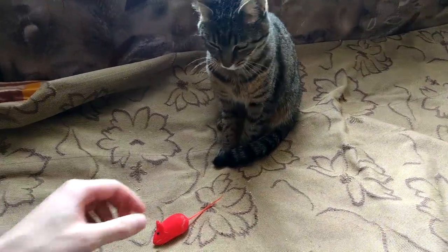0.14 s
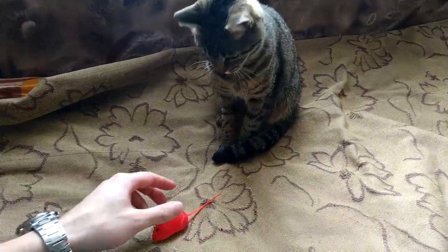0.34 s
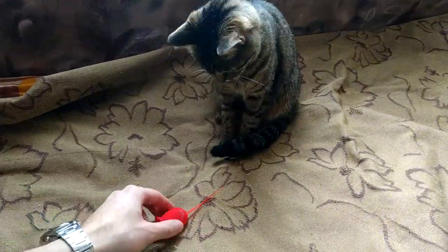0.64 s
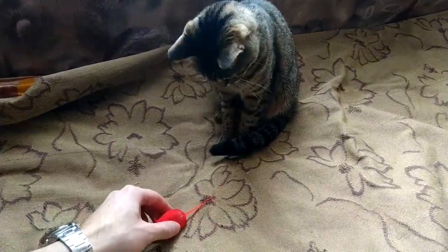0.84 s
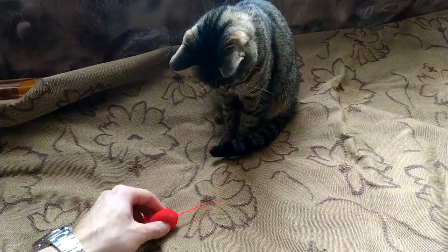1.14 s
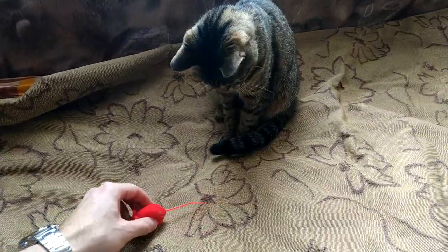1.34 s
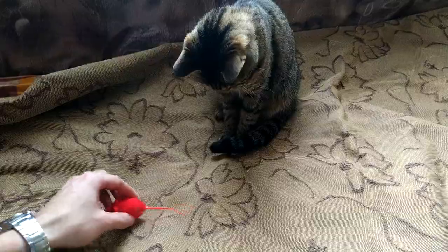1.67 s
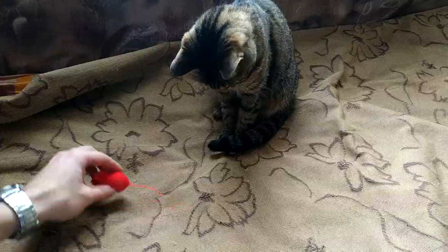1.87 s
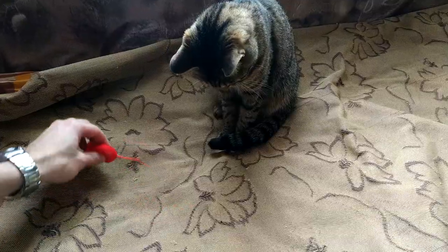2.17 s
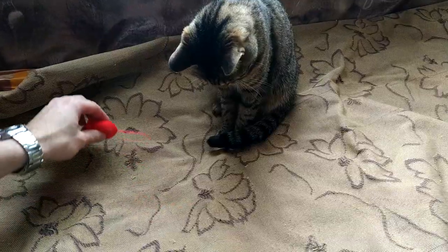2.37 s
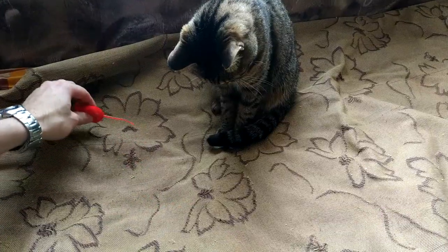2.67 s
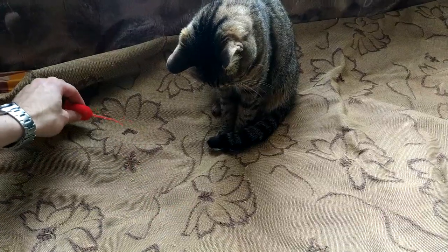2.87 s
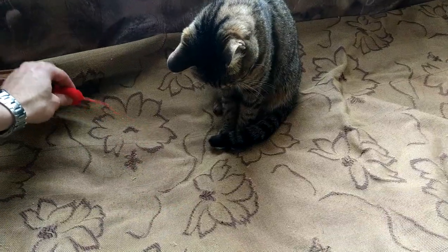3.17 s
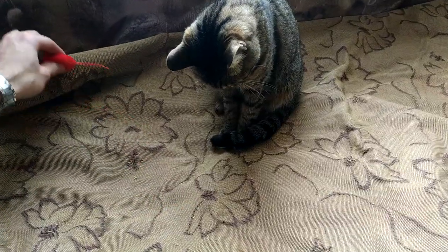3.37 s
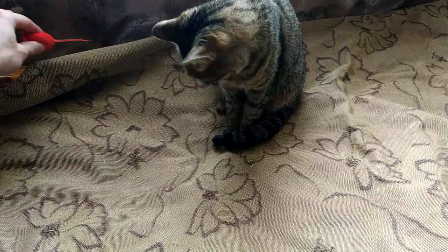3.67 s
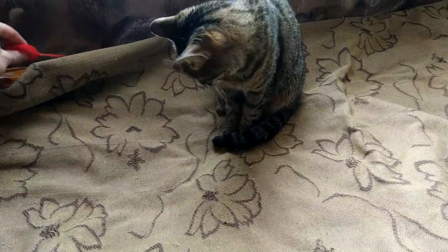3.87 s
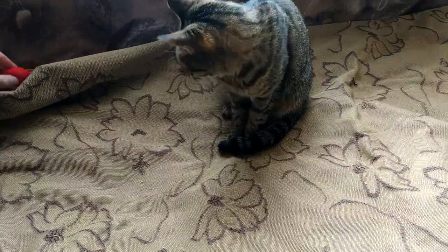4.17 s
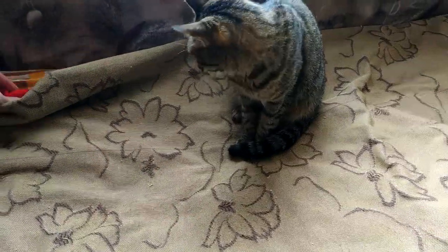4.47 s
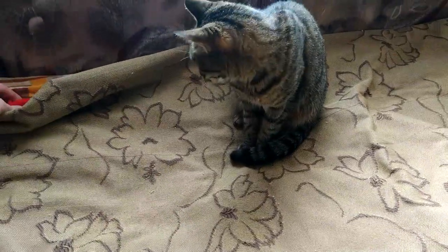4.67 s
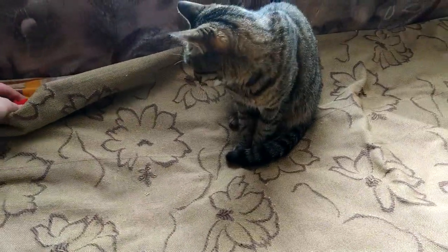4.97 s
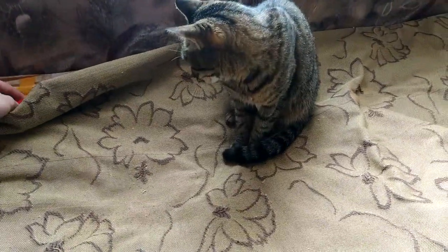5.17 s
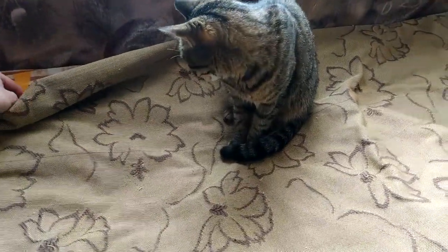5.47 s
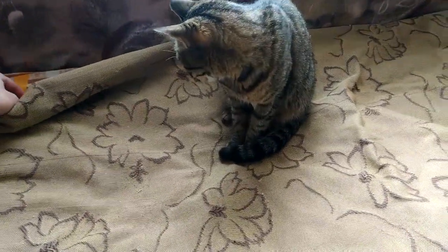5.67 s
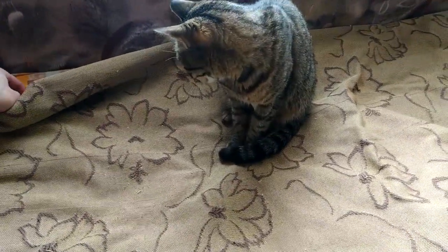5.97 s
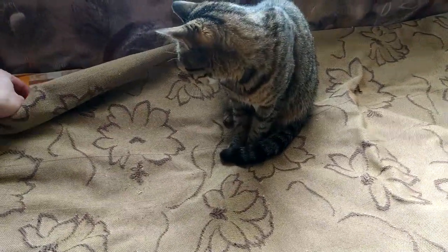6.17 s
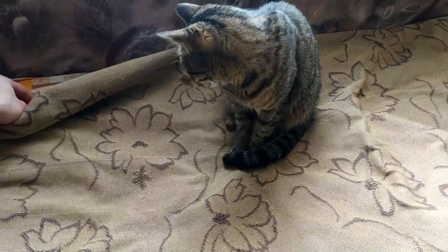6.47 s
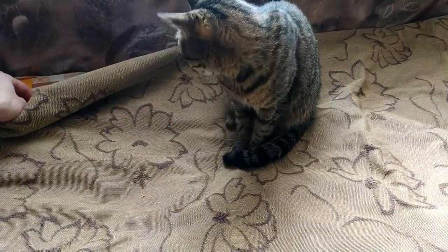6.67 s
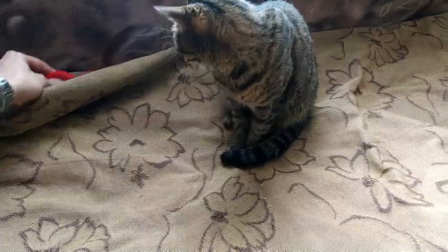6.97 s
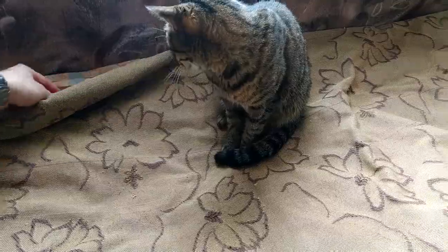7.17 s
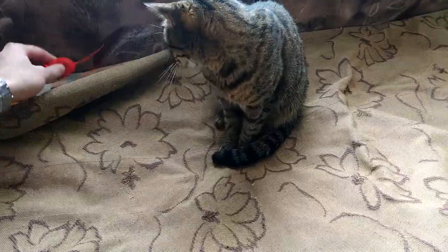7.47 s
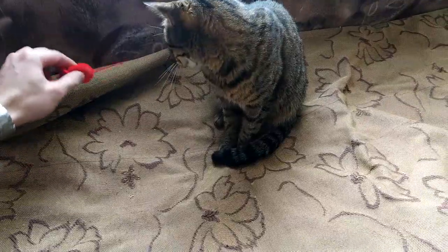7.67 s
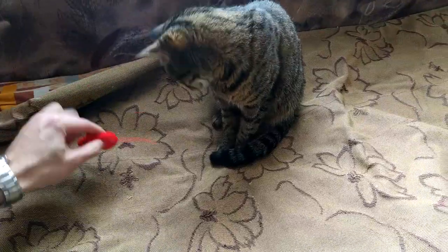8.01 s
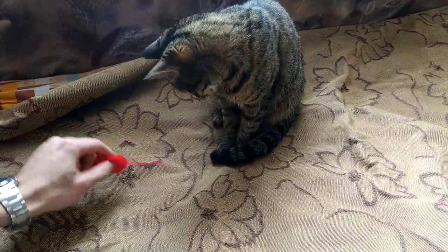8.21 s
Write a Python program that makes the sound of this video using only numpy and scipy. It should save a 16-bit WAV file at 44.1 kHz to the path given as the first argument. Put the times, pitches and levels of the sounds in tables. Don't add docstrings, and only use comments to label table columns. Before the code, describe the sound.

In a quiet furnished room, close to a stereo camera microphone, a hand squeezes a little rubber toy. After a second of faint hiss, hum and cloth rustle come short, piercing reedy squeaks, each arching slightly in pitch and dropping at the end. Past the middle they turn weak, dull and muffled, some barely peeping, then loud bright squeaks return to the end. Soft airy puffs sit between some of them.

```python
import sys
import numpy as np
from scipy import signal
from scipy.io import wavfile
from scipy.ndimage import uniform_filter1d, minimum_filter1d

SR = 44100
rng = np.random.default_rng(int(sys.argv[2]) if len(sys.argv) > 2 else 0)


def unload_audio(sound):
    columns = np.transpose(np.atleast_2d(sound))
    steps = np.round(np.clip(columns, -1, 1) * 32767)
    wavfile.write(sys.argv[1], SR, steps.astype(np.int16))


def elevation(decibels):
    levels = np.asarray(decibels, float)
    return 10 ** (levels / 20)


N = 367970

# [t/s, level/dB]
HUM_LEVEL = [(0.0, -61.5), (0.7, -61), (1.952, -61.5), (2.46, -57.5), (2.85, -59.5), (5.201, -60),
             (5.799, -60.5), (6.301, -66.5), (6.7, -63.5), (7.501, -63), (7.799, -68), (8.34, -65)]
# [f/Hz, density/dB]
HUM_SPECTRUM = [(24, -79), (40, -44.5), (96, -49.5), (177, -8.5), (266, 2), (568, -7.5), (747, -4.5),
                (1120, -10.5), (1210, -19.5), (1500, -17.5), (1950, -61.5), (3300, -120)]
# [f/Hz, width/Hz, level/dB]
HUM_MODES = [(194.4, 20, -69), (273, 21, -74), (346.4, 10, -81.5), (535, 76, -70.5), (618, 7.7, -78),
             (757, 12, -79)]
# [f/Hz, density/dB]
HISS_SPECTRUM = [(590, -29.5), (1000, 2.5), (1050, 3.5), (1310, 5.5), (3420, 3), (13400, 1), (14500, 2)]
HISS_DB = -58.5
# [f/Hz, correlation/1]
LIKENESS = [(60, 0.66), (250, 0.54), (600, 0), (1630, 0.36), (4890, -0.0), (14700, 0.31)]
# [t/s, length/s, low edge f/Hz, high edge f/Hz, level/dB]
PUFFS = [(0.524, 0.14, 1500, 11100, -60), (0.827, 0.2, 4570, 13900, -57.5),
         (1.581, 0.098, 2010, 14140, -56.5), (2.061, 0.25, 5860, 14000, -50.5),
         (2.431, 0.097, 400, 8350, -53), (2.417, 0.2, 156, 488, -54.5), (5.617, .25, 160, 255, -55.5),
         (2.53, 0.074, 6060, 12000, -62.5), (3.109, 0.13, 6730, 13900, -55),
         (3.274, 0.12, 8700, 14100, -54.5), (6.71, 0.12, 7140, 13860, -64), (7.144, 0.052, 380, 5250, -69),
         (8.305, 0.2, 7000, 14200, -52)]
# [t/s, length/s, f/Hz, level/dB]
PEEPS = [
    (5.602, .034, 860, -60),
    (3.31, .03, 860, -65),
    (7.508, .025, 900, -59),
    (7.86, .03, 950, -70),
    (8.29, .03, 1020, -68),
]
# [first beat t/s, length/s, top f/Hz, top level/dB, share of length before letting go/1]
SQUEEZES = [(0.963, 0.07, 1554, -15, 0.46), (2.119, 0.089, 1552, -13.5, 0.32),
            (2.594, 0.057, 1441, -15, 0.36), (2.849, 0.058, 1450, -19, 0.84),
            (3.153, 0.019, 1382, -26, 0.33), (3.412, 0.062, 1487, -17.5, 0.55),
            (3.784, 0.074, 1557, -15.5, 0.49), (4.217, 0.098, 1530, -21, 0.42),
            (4.434, .039, 1326, -35, 0.23), (4.692, .076, 1489, -30, 0.35), (5.054, 0.043, 1318, -42, .3),
            (5.723, 0.06, 1499, -25.5, 0.59), (6.02, 0.03, 1446, -26, 0.39),
            (6.299, 0.032, 1383, -43, 0.23), (6.567, 0.034, 1444, -37.5, 0.26),
            (6.844, 0.073, 1593, -16.5, 0.25), (7.315, 0.1, 1549, -17, 0.69),
            (7.528, 0.052, 1334, -24, 0.15), (7.705, 0.052, 1559, -13, .5),
            (8.098, .041, 1470, -15.5, 0.69)]
# [fundamental level/dB, 3.5 kHz level/dB, 6 kHz level/dB, 13 kHz level/dB]
GRIPS = [(-16, -7, -3, -1), (-25, -23.5, -12, -8), (-23.5, -20, -26, -12), (-21, -10.5, -16.5, -8.5),
         (-13.5, -11, -10.5, -7), (-25, -9, -9.5, -10), (-24, -15.5, -8.5, -4.5), (-18.5, -14.5, -15.5, -5),
         (-8.5, -1, -6, 8), (-0.5, 0, 0.5, -8), (12, 11.5, 1.5, 4.5), (-1.5, 6.5, 4.5, 0.5),
         (-2, 4.5, 0.5, -5), (13.5, 14.5, 7.5, 4), (2.5, 7.5, 1.5, 0.5), (-20.5, -18, -11, -15),
         (-23, -19.5, -19.5, -7), (-22.5, -11.5, -21, -1.5), (-29, -14, -12.5, -10.5),
         (-19, -18.5, -17.5, -10)]
# [overtones left-right/dB, fundamental left-right/dB]
BALANCES = [(-3, -5.5), (0, 4), (1.5, -2.5), (10, -3), (3, -7.5), (16.5, -6), (7, -7), (9.5, -1.5), (9, 10.5),
            (15, -3), (9, 5.5), (4, -0.5), (5.5, -5.5), (5, 2), (7, 1.5), (5, 1.5), (5.5, 4.5), (1.5, 9),
            (0.5, -4.5), (1, -8)]
# [t/s, lead/samples]
LEFT_LEAD = [
    (0.96, 0.5),
    (2.12, 4.75),
    (3.15, 8.6),
    (3.41, 10.8),
    (4.2, 9.6),
    (4.7, 10.6),
    (6.57, 10.4),
    (8.1, 6.3),
]
# [delay/s, left level/dB, right level/dB]
ECHOES = [(.0011, -21.5, -14.5), (.0023, -21, -12.5), (.0041, -27, -21.5), (.0067, -25.5, -13),
          (.0098, -27.5, -38)]
# [f/Hz, t60/s]
ROOM_T60 = [(1000, 0.15), (3000, 0.14), (7000, 0.14), (10000, 0.17), (14000, 0.11)]

RISE, SAG, SAG_POWER, PLUNGE, PLUNGE_S = 0.034, 0.1, 1.3, 0.091, 0.0042
RISE_PER_DB, FIRM_DB = 0.002, -11.5
DB_PER_SHARE = 93
HIDDEN_SHARE, OPEN_DB = 0.2, -17


def evened(x):
    return x / np.sqrt(np.mean(x ** 2) + 1e-20)


def read(points, hz):
    f, value = np.transpose(points)
    return np.interp(np.log(hz + 1), np.log(f + 1), value)


def add(mix, start_s, sound):
    part = mix[:, round(start_s * SR):][:, :sound.shape[-1]]
    part += sound[..., :part.shape[1]]


def wander(count, size):
    white = rng.standard_normal((count, 9000))
    return evened(signal.fftconvolve(white, np.hanning(2 * size)[None], "valid"))


def noise(spectrum, patchy_db):
    frames, hz = N // 256 + 5, np.fft.rfftfreq(1024, 1 / SR)
    a, b, c, d, patches = rng.standard_normal((frames, 513, 5)).T
    patches = uniform_filter1d(patches, size=10, axis=0)
    patches = evened(uniform_filter1d(patches, size=12, axis=1))
    same = np.clip(read(LIKENESS, hz), -1, 1)[:, None]
    left = a + 1j * b
    right = same * left + np.sqrt(1 - same ** 2) * (c + 1j * d)
    z = np.array([left, right]) * elevation(read(spectrum, hz)[:, None] + patchy_db * patches)
    return evened(signal.istft(z, nperseg=1024, noverlap=768)[1][:, :N])


def hum():
    tones = np.zeros(N)
    for hz, width_hz, db in HUM_MODES:
        peak = signal.iirpeak(hz, hz / width_hz, SR)
        tones += elevation(db) * evened(signal.lfilter(*peak, rng.standard_normal(N)))
    level_db = np.interp(np.arange(N) / SR, *np.transpose(HUM_LEVEL))
    return elevation(level_db) * (noise(HUM_SPECTRUM, patchy_db=1.4) + tones / elevation(level_db.mean()))


def hiss():
    return elevation(HISS_DB) * noise(HISS_SPECTRUM, patchy_db=3.0)


def room(near, tail_db=-8, early_db=3, late_db=-22, late_factor=2.1):
    taps = np.zeros((2, SR // 2))
    at = np.arange(200, SR // 2 - 20, 20) + rng.integers(0, 20, (2, (SR // 2 - 201) // 20))
    np.put_along_axis(taps, at, rng.choice([-1., 1.], at.shape), 1)
    hz, t, z = signal.stft(taps, SR, nperseg=256)
    fall_db = -60 * t / read(ROOM_T60, hz)[:, None]
    decay = elevation(early_db + 4.27 * fall_db) + elevation(fall_db) + elevation(late_db + fall_db / late_factor)
    tail = signal.istft(z * decay, SR, nperseg=256)[1]
    tail *= elevation(tail_db) / np.linalg.norm(tail[0])
    echoes = np.zeros((2, 800))
    echoes[:, 0] = 1
    for n, (delay_s, left_db, right_db) in enumerate(ECHOES):
        at = [round(delay_s * SR), round(delay_s * SR * 1.12)]
        echoes[[0, 1], at] = (-1) ** n * elevation(np.array([left_db, right_db]))
    direct = signal.fftconvolve(near[:2], echoes, axes=1)[:, :N]
    around = signal.fftconvolve(near[2:], tail, axes=1)[:, :N]
    return direct + around


def puff(start_s, length_s, low_hz, high_hz, db):
    u = np.arange(0, 1, 1 / SR / length_s)
    shared, left, right, grain = rng.standard_normal((4, 12000))[:, :len(u)]
    air = 1.7 * shared + np.array([left, right])
    air *= elevation(2.8 * evened(uniform_filter1d(grain, size=90)))
    band = signal.butter(2, [low_hz, min(high_hz, 16000)], "band", fs=SR, output="sos")
    swell = np.sin(np.pi * u ** 0.8)
    return start_s, elevation(db) * evened(signal.sosfilt(band, air)) * swell


def peep(start_s, length_s, hz, db):
    u = np.arange(0, 1, 1 / SR / length_s)
    turns = np.cumsum(hz * (0.93 + 0.12 * u)) / SR
    return start_s, elevation(db) * np.sin(np.pi * u) * np.sin(2 * np.pi * turns)


def squeak(squeeze, grip, balance, swing_s=0.0051, wake=0.13, wake_s=0.0022, dull_db=0.3636, snap_db=-11):
    waver, coast_s, leak = 0.0006, 0.013, 0.8
    start_s, length_s, top_hz, level_db, peak = squeeze
    end_s = start_s + length_s
    (low_db, middle_db, upper_db, top_db), (pan_db, low_pan_db) = grip, balance
    t = np.arange(start_s - swing_s, end_s + coast_s, 1 / SR)

    u = ((t - start_s) / length_s).clip(0, 1)
    rise = RISE + RISE_PER_DB * (FIRM_DB - level_db)
    under = rise * (1 - u / peak).clip(0) ** 2
    under += SAG * ((u - peak) / (1 - peak)).clip(0) ** SAG_POWER
    under += PLUNGE * np.exp(np.minimum(t - end_s, 0) / PLUNGE_S)
    hz = top_hz * (1 - under)
    hz *= 1 - wake * np.exp(-(t - start_s) / wake_s).clip(0, 3)
    hz *= 1 - 0.21 * np.clip((t - end_s) / coast_s, 0, 1)
    hz *= 1 + waver * wander(count=1, size=90)[0][:len(t)]
    db = level_db - DB_PER_SHARE * under

    k = np.arange(1, 13)[:, None]
    shade = [(1700, low_db + 8.5), (2300, middle_db), (4700, middle_db), (6200, upper_db),
             (7600, 0.46 * upper_db - 0.14), (9300, 1.0), (10800, 0.13), (12500, top_db), (14500, top_db - 5.5)]
    shade_db = read(shade, k * hz)
    tone = elevation(shade_db) * (k * hz < 15500)
    tone /= np.sqrt((tone ** 2).sum(0).mean() / 2)
    tone *= elevation(dull_db * (k - 5) / 5 * (db - db.max()))
    tone *= elevation(2.6 * wander(count=12, size=400)[:, :len(t)])
    beating = np.clip((t - start_s + 0.001) / 0.0024, 0, 1) ** 2
    beating *= np.clip((end_s + 0.004 - t) / 0.008, 0, 1)
    swinging = np.clip((t - t[0]) / (swing_s + 0.002), 0, 1) ** 2
    swinging *= np.clip((t[-1] - t) / coast_s, 0, 1)
    tone *= elevation(db) * np.where(k == 1, swinging, beating)

    side = elevation(np.where(k < 2, low_pan_db, pan_db * np.clip((k - 2) / 4, 0, 1)) / 2)
    turns = np.cumsum(hz) / SR
    lag_turns = hz / SR * np.interp(start_s, *np.transpose(LEFT_LEAD))
    phase = 0.1 * k ** 2
    left = tone * np.cos(2 * np.pi * k * turns - phase)
    right = tone * np.cos(2 * np.pi * k * (turns - lag_turns) - phase)
    around = left * elevation((leak - 1) * shade_db)
    hidden = elevation(HIDDEN_SHARE * (middle_db - OPEN_DB) / 2)
    paths = [left / hidden * side, right / hidden / side, around * hidden]

    ragged = np.diff(rng.standard_normal((3, 8000)))[:, :len(t)] / np.sqrt(2)
    snap = elevation(db[0] + snap_db) * beating * np.exp(-abs(t - start_s) / 0.0051) * ragged
    return t[0], np.array([x.sum(0) for x in paths]) + snap


def scene():
    near, hand = np.zeros((3, N)), np.zeros((2, N))
    for row in PUFFS:
        add(hand, *puff(*row))
    for row in PEEPS:
        add(near, *peep(*row))
    for squeeze, grip, balance in zip(SQUEEZES, GRIPS, BALANCES):
        add(near, *squeak(squeeze, grip, balance))
    return hum() + hiss() + hand + elevation(10.5) * room(near)


def gain_control(x, knee_db=-32, recover_db_per_s=45, duck_share=0.25):
    power_db = 10 * np.log10(abs(uniform_filter1d((x ** 2).mean(0), size=130)) + 1e-12)
    fall_db = np.arange(N) * recover_db_per_s / duck_share / SR
    held_db = np.maximum.accumulate(power_db + fall_db) - fall_db
    over_db = np.maximum(held_db - knee_db, 0)
    return x / elevation(duck_share * uniform_filter1d(over_db, size=90))


def gate(x):
    under_db, cut_db, low_hz, high_hz = 16.5, -30, 1850, 13500
    hz, _, z = signal.stft(x, SR, nperseg=1024, noverlap=768)
    band_db = 10 * np.log10(abs(uniform_filter1d(abs(z) ** 2, size=11, axis=1)) + 1e-20)
    loudest_db = -minimum_filter1d(-band_db, size=49, axis=1)
    in_range = ((hz > low_hz) & (hz < high_hz))[:, None]
    shut = (band_db < loudest_db - under_db) & in_range
    return signal.istft(z * elevation(cut_db * shut), SR, nperseg=1024, noverlap=768)[1][:, :N]


def band_limit(x):
    return signal.sosfilt(signal.butter(12, 15280, fs=SR, output="sos"), x)


def record(dry):
    x = gain_control(dry)
    straight = np.clip(x, -0.55, 0.55)
    x = straight + 0.22 * np.tanh((x - straight) / 0.22)
    x = signal.sosfilt(signal.butter(2, 140, "high", fs=SR, output="sos"), x)
    edge = signal.firwin(511, 14200, window=("kaiser", 10), fs=SR)
    mix = gate(signal.oaconvolve(x, edge[None], "same"))
    return band_limit(mix)


dry = scene()
out = record(dry)
unload_audio(out)
```